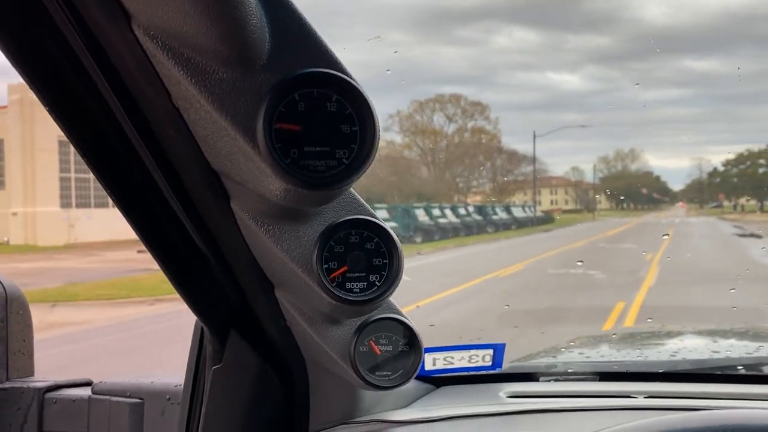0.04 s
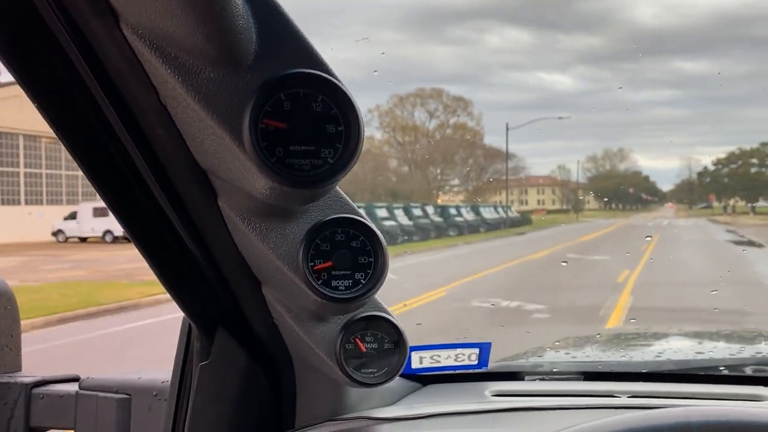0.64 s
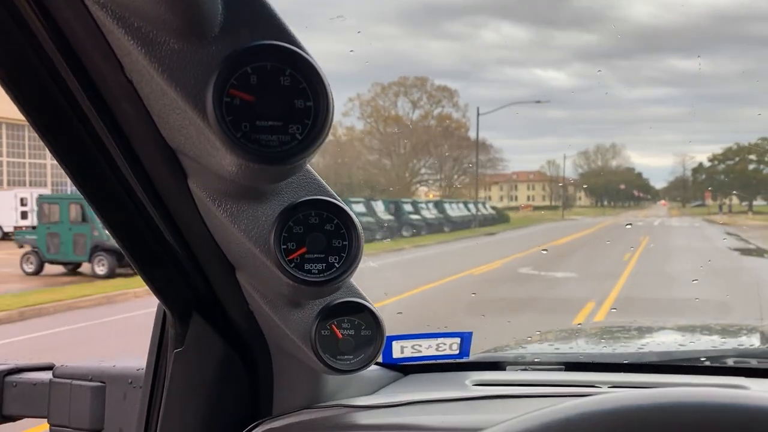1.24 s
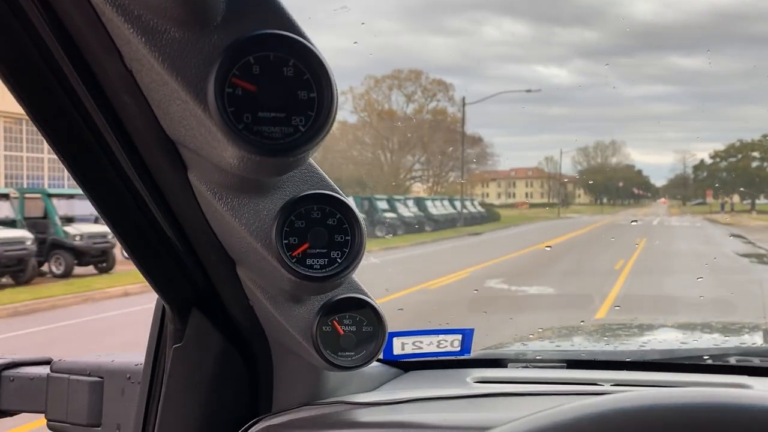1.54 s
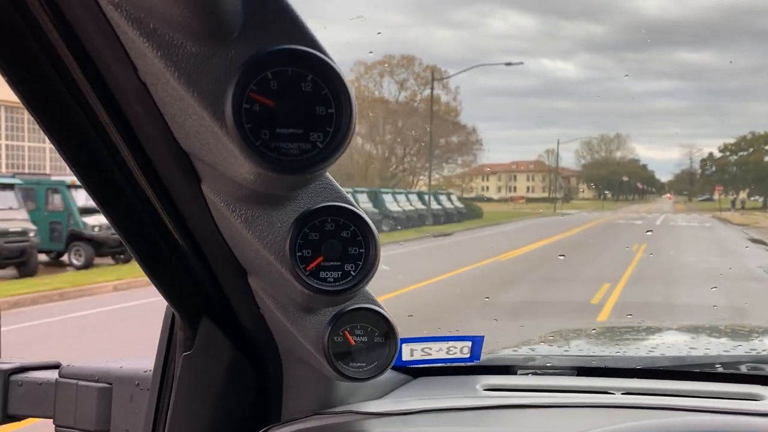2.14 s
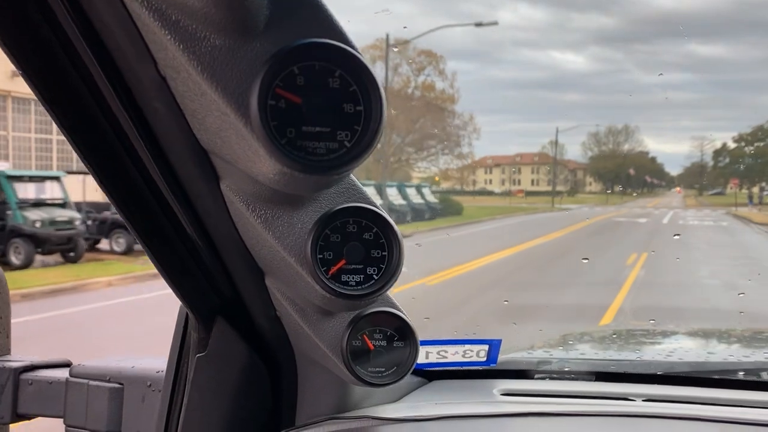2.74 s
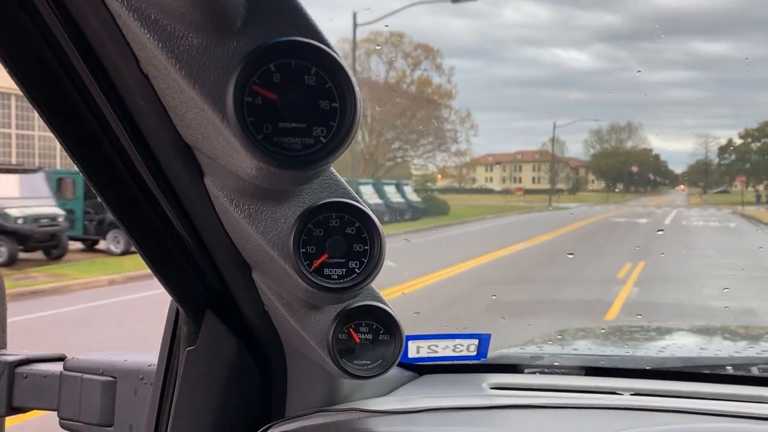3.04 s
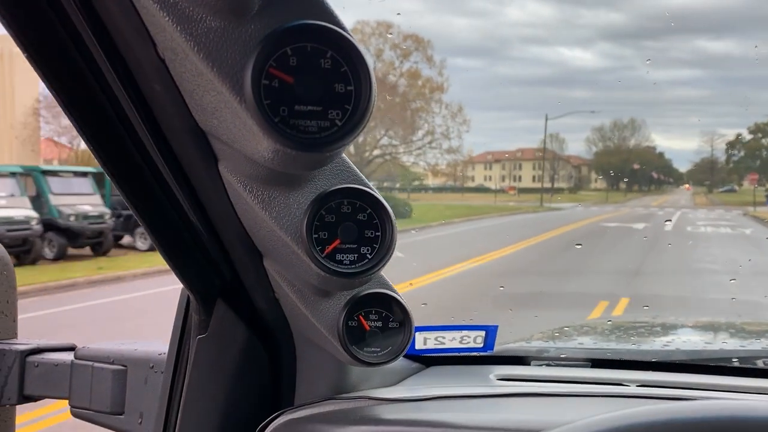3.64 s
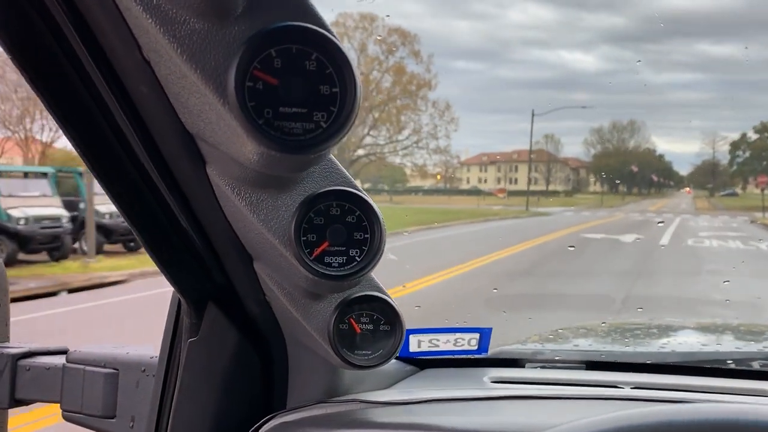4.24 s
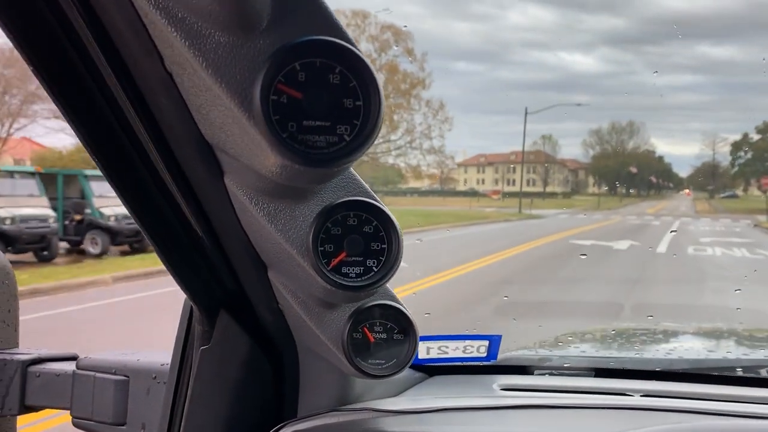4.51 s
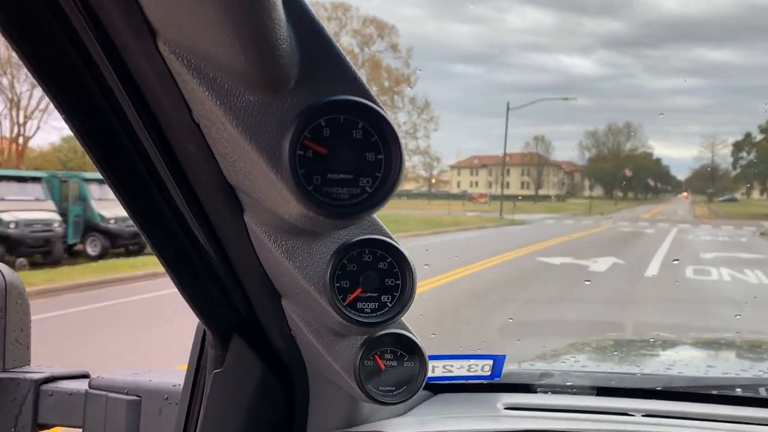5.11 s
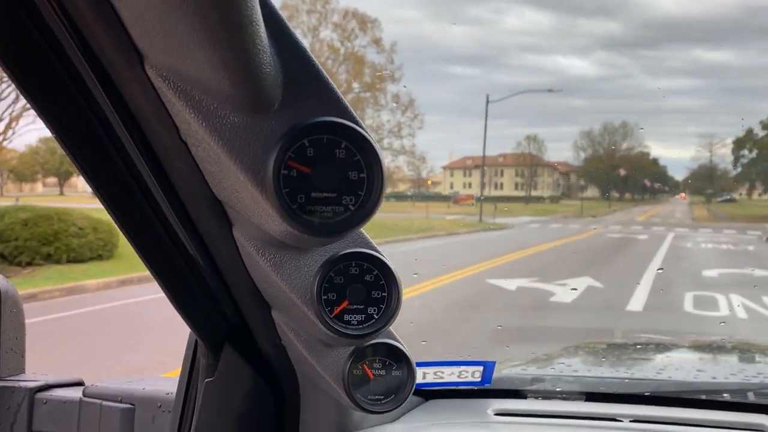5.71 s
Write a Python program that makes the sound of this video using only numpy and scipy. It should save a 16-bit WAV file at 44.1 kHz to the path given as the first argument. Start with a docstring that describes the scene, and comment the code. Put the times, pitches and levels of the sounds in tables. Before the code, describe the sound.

Heard from inside the cab of a moving pickup, a diesel engine pulls hard, droning and clattering while a high, hissy turbo whistle climbs. The throttle soon closes and the whistle winds down as the revs drop. What remains is a quieter cruise: a low, throbbing engine hum, tyres on asphalt, faint wind hiss and a few soft rattles of loose trim.

```python
"""A deep exhaust drone, hard clatter and a rising whistle fill the cab of a turbo-diesel V8 pickup.
Each firing of a cylinder pushes a pulse down the exhaust and knocks the engine block; the spinning
turbo makes the whistle. The driver lifts off the pedal, the drone fades and the whistle winds down.
The truck rolls on with a soft engine hum, throbbing knocks and pings, cab rumble, tyre noise
and a few rattles of loose trim."""
import sys
import numpy as np
from scipy import signal
from scipy.fft import rfft, irfft
from scipy.io import wavfile
from scipy.ndimage import uniform_filter1d

SR = 44100
rng = np.random.default_rng(int(sys.argv[2]) if len(sys.argv) > 2 else 0)


def output_pcm(signal):
    """Save a mono or channel-first signal as 16-bit PCM at the path in sys.argv[1].

    Samples are clipped to [-1, 1] before scaling.
    """
    pcm = np.clip(np.atleast_2d(signal).T, -1, 1) * 32767
    wavfile.write(sys.argv[1], SR, np.round(pcm).astype(np.int16))


N = 254456
T = np.arange(N) / SR
BIN_HZ = np.maximum(np.arange(N // 2 + 1) * SR / N, 1)
CYLINDERS = 8  # each fires once per engine cycle
LIFT_S, SHUT_S, CRUISE_S = 0.74, 1.535, 3.2  # the pedal starts to lift, is fully up; cruising begins

# Engine speed, as firings per second: time_s, firing_hz
ENGINE_SPEED = [(0, 132.2), (.15, 137.3), (.55, 147.7), (.75, 149.3), (.85, 143.7), (1.1, 122.5),
                (1.36, 106.3), (1.52, 106), (1.7, 119), (1.92, 114.5), (2.4, 102), (2.65, 95.5), (2.92, 92),
                (3.15, 84), (3.5, 79.5), (4.45, 80.6), (5.05, 88.2), (5.77, 88)]
# Turbo speed, as the pitch of its whistle: time_s, pitch_hz
TURBO_SPEED = [(0, 6750), (.25, 7550), (.56, 9900), (.68, 10150), (.8, 9800), (1.05, 8400), (1.18, 7850),
               (1.25, 7150), (1.36, 7000), (1.5, 6500), (1.72, 5540), (2, 5160), (2.47, 4580), (2.77, 4235),
               (3.15, 3730), (3.6, 3450)]
# How loud the tyres roar: time_s, level_db
TYRE_LEVEL = [(0, -43), (1.1, -36.5), (2.3, -34), (3.7, -36), (5.77, -43)]


def undb(db):
    """Turn decibels into a gain."""
    return 10 ** (np.asarray(db) / 20)


def unit(x):
    """Scale to an average (rms) level of 1."""
    return x / np.sqrt(np.mean(x ** 2))


def curves(table):
    """Join the rows of a time table with straight lines, one value per sample."""
    times, *columns = np.transpose(table)
    return np.squeeze([np.interp(T, times, column) for column in columns])


def response(points):
    """A gain for every frequency, from rows of pitch_hz, gain_db."""
    hz, db = np.transpose(points)
    return undb(np.interp(np.log(BIN_HZ), np.log(hz), db))


def resonances(modes, at=BIN_HZ):
    """Gain at the given frequencies, from peaks listed as pitch_hz, width_hz, gain_db."""
    return undb(sum(db / (1 + (2 * (at - hz) / width) ** 2) for hz, width, db in modes))


def colour(x, gain):
    """Filter a sound with one gain per frequency."""
    return irfft(rfft(x) * gain, N)


def wander(rate_hz):
    """A smooth random wobble of size 1, up to about the given rate."""
    return unit(colour(rng.standard_normal(N), np.exp(-np.minimum(BIN_HZ / rate_hz, 10) ** 2)))


def flutter(rate_hz):
    """A two-part wobble that shifts both the level and the phase of a tone."""
    return wander(rate_hz) + 1j * wander(rate_hz)


def swells(events, attack_s):
    """A level that rises and dies away for each row of peak_s, level_db, decay_s."""
    return sum(undb(db) * np.clip(1 + (T - s) / attack_s, 0, 1) * np.exp(-np.maximum(T - s, 0) / decay)
               for s, db, decay in events)


def steady(x, window_s=0.056):
    """Even out the chance swells of a noise."""
    power = uniform_filter1d(np.mean(x ** 2, axis=0), int(window_s * SR))
    return x * np.sqrt(power.mean() / power)


def place(x, pan_db):
    """Lean a sound to the left (positive) or right (negative)."""
    return x * undb(np.array([[pan_db], [-pan_db]]) / 2)


def cab(pair, gain):
    """Filter two signals into cab sound: bass alike in both ears, treble scattered by the glass."""
    # Strength of the side (what differs between the ears) against the mid: pitch_hz, gain_db
    ear_width = [(60, -14), (130, -11.5), (220, -10), (380, -2), (700, 0), (1290, -1), (2600, -4),
                 (4400, -3.5), (8000, 2), (15000, -1)]
    # How much louder the left ear is: pitch_hz, gain_db
    ear_lean = [(60, -5), (130, -2), (220, -2), (400, 0.5), (700, 2.5), (1290, 3), (2400, -0.5), (4400, -5),
                (8000, 0.5), (15000, 2.5)]
    # Part of the side that is the mid a quarter wave early (negative: late): pitch_hz, share
    ear_lead = [(150, 0.22), (430, 0.59), (690, 1), (1460, 0.92), (2000, 0.4), (2800, -0.77), (5300, -.6),
                (7000, .75), (11000, .3)]
    mid, scattered = colour(pair, gain)
    lead = np.clip(np.interp(BIN_HZ, *np.transpose(ear_lead)), -1, 1)
    width = response(ear_width)
    side = colour(mid, 1j * lead * width) + colour(scattered, np.sqrt(1 - lead ** 2) * width)
    lean = np.sqrt(response(ear_lean))
    return np.array([colour(mid + side, lean), colour(mid - side, 1 / lean)]) / np.std(mid)


def cab_noise(gain):
    """Filtered noise spread around the cab."""
    return cab(rng.standard_normal((2, N)), gain)


def throttle():
    """How far the pedal is down, from 1 to 0."""
    return np.clip((SHUT_S - T) / (SHUT_S - LIFT_S), 0, 1)


def firings(cycle, jitter_s):
    """The slightly uneven sample position of each firing, and a random number for its strength."""
    on_time = np.flatnonzero(np.diff(np.floor(cycle * CYLINDERS)))
    timing, strength = rng.standard_normal((len(on_time), 2)).T
    return np.clip(on_time + (jitter_s * SR * timing).astype(int), 0, N - 1), strength


def exhaust(cycle, shake_db=-2.0, roughness=0.071, softening=0.28):
    """The firing tone swells as the engine pulls; one weak cylinder adds an uneven beat, the lope."""
    # How loud the drone is: time_s, level_db
    drone_level = [(0, -11.5), (.45, -11), (.75, -9.5), (.97, -11), (1.22, -15.5), (1.36, -18), (1.47, -32)]
    # Tones of the lope against the firing tone: order (waves per engine cycle), gain_db
    lope_tones = [(3, -24), (5, -32.5), (6, -25.5), (7, -22), (9, -14.5), (10, -18), (11, -15.5), (12, -21),
                  (13, -40), (14, -25.5), (15, -27), (16, -39), (18, -38), (19, -27.5), (21, -30),
                  (23, -36), (24, -29.5), (28, -40)]
    # Pipe resonances that growl as a tone slides into them: pitch_hz, width_hz, gain_db
    pipe_modes = [(186.4, 13, 4), (242, 18, 6.5), (398, 22, 4.5), (451, 22, 10)]
    drone_db = curves(drone_level)
    firing = np.cos(2 * np.pi * CYLINDERS * cycle) * undb(shake_db * wander(25))
    cycle_hz = np.gradient(cycle) * SR
    lope = 0
    for order, db in lope_tones:
        # softer pulses lose their high tones first
        softer_db = softening * (drone_db - drone_db.max()) * max(order / CYLINDERS - 1.5, 0)
        size = undb(db + softer_db) * resonances(pipe_modes, order * cycle_hz)
        size *= 1 + roughness * wander(17)
        lope -= size * np.cos(2 * np.pi * order * cycle + np.pi / 4)
    return place(np.sqrt(2) * (firing + lope) * undb(drone_db), pan_db=0)


def combustion(pull_db=-26.5, coast_db=-47, cruise_db=-40.5):
    """Strength of the knocks: hard when pulling, weakest when coasting, firmer again when cruising."""
    light_db = np.interp(T, [SHUT_S, CRUISE_S], [coast_db, cruise_db])
    return np.hypot(undb(pull_db) * throttle() ** 0.81, undb(light_db))


def clatter(cycle, ring_s=0.017, scatter_db=2.13, gas_db=-3, gas_above_hz=900):
    """Each cylinder knocks the block along its own path and gas hisses; at low speed the knocks throb."""
    # Tone of the clatter: pitch_hz, gain_db
    clatter_colour = [(150, 5.5), (280, 8), (430, 1), (520, 2), (1400, -4), (2300, -7.5), (3150, -10.5),
                      (3500, -18), (4400, -21), (5200, -23), (7500, -20.5), (9000, -38.5), (10500, -31.5),
                      (14500, -46.5)]
    # Resonances of the engine block and the wall behind it: pitch_hz, width_hz, gain_db
    block_modes = [(440, 16, -1.5), (650, 14, 1), (910, 32, -8), (1000, 66, 5.5), (1180, 33, 1),
                   (1294, 43, 7.5), (1514, 29, 6.5), (1690, 32, 0.5), (2776, 47, 7), (3000, 54, 3.5),
                   (3205, 40, 3), (4310, 71, 8)]
    # How much every other knock stands out: firing_hz, depth (0 to 1)
    throb_depth = [(80, .24), (100, .11), (130, .02)]
    at, strength = firings(cycle, jitter_s=0.00006)
    size = undb(scatter_db * strength)
    fade = np.exp(-T[:SR // 10] / ring_s)
    knocks = 0
    for k in range(CYLINDERS):
        blows = np.zeros((1, N))
        blows[0, at[k::CYLINDERS]] = size[k::CYLINDERS]
        ring = fade * rng.standard_normal((2, len(fade)))
        knocks += signal.oaconvolve(blows, ring, axes=1)[:, :N]
    gas = colour(rng.standard_normal((2, N)), 1 / (1 + (gas_above_hz / BIN_HZ) ** 4))
    depth = np.interp(curves(ENGINE_SPEED), *np.transpose(throb_depth))
    throb = depth * np.cos(np.pi * CYLINDERS * cycle - np.pi / 4)
    lope = 0.02 * throttle() * np.cos(2 * np.pi * cycle)
    block = response(clatter_colour) * resonances(block_modes)
    return cab(unit(knocks) + undb(gas_db) * gas, block) * combustion() * (1 + throb + lope)


def turbo(gap_hz=165, clean_hz=3500, hissy_hz=6000, octave_db=-16.5, flicker_db=1):
    """The turbo's wheel whistles at two close pitches: hissy when fast, clearer as it slows."""
    # How loud the two whistles are: time_s, lower_db, upper_db
    whistle_levels = [(0, -45.5, -58), (.6, -45, -51), (1.1, -54, -52), (1.27, -56, -64), (1.49, -54, -65),
                      (1.64, -76, -73), (1.74, -60, -64), (1.848, -49.5, -55), (1.95, -55, -65),
                      (2.38, -68, -70), (2.48, -54, -62), (2.63, -57, -57), (2.71, -61, -66),
                      (2.771, -57, -66), (2.87, -54.5, -62), (3, -60, -64), (3.15, -58, -55),
                      (3.26, -64, -69), (3.6, -74, -78)]
    # Peaks and dips of the air duct that the whistles slide through: pitch_hz, width_hz, gain_db
    duct_modes = [(3780, 110, -2), (4236, 70, 9.5), (4680, 70, 6), (5365, 65, 6.5), (7430, 990, 5),
                  (8800, 1100, -7.5)]
    hz = curves(TURBO_SPEED)
    hiss_share = np.clip((hz - clean_hz) / (hissy_hz - clean_hz), 0, 1)
    wide_share = np.sqrt(throttle())
    whistle = 0
    for pitch, db in zip((hz, hz + gap_hz), curves(whistle_levels)):
        tone = np.exp(2j * np.pi * np.cumsum(pitch) / SR)
        # echoes in the cab make the tone flutter differently at each ear
        clear = 0.88 + 0.33 * np.array([flutter(65), flutter(65)])
        # the hiss is a wide band with the pedal down, a narrow one with it up
        wide = np.array([flutter(800), flutter(800)])
        narrow = np.array([flutter(110), flutter(110)])
        hiss = np.sqrt(wide_share) * wide + np.sqrt(1 - wide_share) * narrow
        blend = np.sqrt(2 * (1 - hiss_share)) * clear + np.sqrt(hiss_share) * hiss
        octave = tone ** 2 * narrow * np.sqrt(1 - hiss_share) * undb(octave_db)
        whistle += np.real(tone * blend * resonances(duct_modes, pitch) + octave) * undb(db)
    return place(whistle * undb(flicker_db * wander(20)), pan_db=-3)


def intake(full_db=-46, flicker_db=1.5):
    """Air rushes through the turbo while it spins fast and the pedal is down."""
    # Tone of the rushing air: pitch_hz, gain_db
    rush_colour = [(4000, -24), (7000, -7), (8300, 10.5), (9100, -32), (9900, 7.5), (11500, 0.5),
                   (14000, 0), (15400, -13)]
    hz = curves(TURBO_SPEED)
    flow = (hz / hz.max()) ** 2.7 * throttle() ** 5
    return cab_noise(response(rush_colour)) * flow * undb(full_db + flicker_db * wander(11))


def rumble(road_db=-23.5, shake_db=-20.5, shake_at_hz=117.4, shake_db_per_hz=-0.2825):
    """The road shakes the cab; so does the pulling engine, less as it speeds up."""
    # Tone of the rumble: pitch_hz, gain_db
    rumble_colour = [(15, -42), (25, -20), (40, -3), (57, 0), (85, -1), (110, -1.5), (135, -1.5),
                     (190, 0.5), (215, -2.5), (270, -13), (330, -21), (420, -20.5), (520, -26.5),
                     (900, -62), (3000, -92)]
    tyre_db = curves(TYRE_LEVEL)
    road = undb(road_db + 0.3 * (tyre_db - tyre_db.max()))  # partly follows the tyres' swell
    shake = undb(shake_db + shake_db_per_hz * (curves(ENGINE_SPEED) - shake_at_hz)) * throttle() ** 0.27
    return steady(cab_noise(response(rumble_colour))) * np.hypot(road, shake)


def boom(base_db=-33.5):
    """The air in the cab booms at its lowest resonance, swelling now and then."""
    # Tone of the boom: pitch_hz, gain_db
    boom_colour = [(40, -27), (50, -1.5), (57, 3.5), (62, -14), (72, -28)]
    # Swells of the low cab boom: peak_s, level_db, decay_s
    boom_swells = [(.72, -32, .2), (1.92, -30, 0.3), (4.3, -18, 0.079), (5.51, -25, .12)]
    top_hz = boom_colour[-1][0]
    level = np.hypot(swells(boom_swells, attack_s=0.044), undb(base_db))
    return cab_noise(response(boom_colour) * (BIN_HZ < top_hz)) * level


def tyres(patchy_db=0.9):
    """The tread roars on the asphalt and slaps over seams in the road."""
    # Tone of the roar: pitch_hz, gain_db
    tyre_colour = [(250, -4.5), (400, -1), (520, -6.5), (680, 2), (860, -3), (1050, -6), (1250, -11),
                   (1700, -18.5), (2400, -25), (5000, -51.5), (10000, -70)]
    # Resonances of the tread: pitch_hz, width_hz, gain_db
    tread_modes = [(642, 8.6, 5.5), (854, 51, 5.5)]
    # Slaps over seams: peak_s, level_db, decay_s
    slaps = [(1.575, -29, 0.013), (1.76, -31, 0.012), (2.982, -32, 0.0059)]
    roar = undb(curves(TYRE_LEVEL) + patchy_db * wander(23))
    contact = np.hypot(roar, swells(slaps, attack_s=0.003))
    return cab_noise(response(tyre_colour) * resonances(tread_modes)) * contact


def wind(level_db=-50, gust_db=1):
    """Air hisses along the doors."""
    # Tone of the hiss: pitch_hz, gain_db
    air_colour = [(900, -37), (1700, 5), (2800, 5.5), (3500, -4), (4500, 1), (5200, -4), (6300, -2.5),
                  (7700, -10), (9000, -20), (11000, -17.5), (14500, -30)]
    return cab_noise(response(air_colour)) * undb(level_db + gust_db * wander(25))


def hum(cycle):
    """As the pedal lifts, the engine's low tones beat together, each swelling at a cab resonance."""
    # Tones of the hum: order (waves per engine cycle), gain_db
    hum_tones = [(4, -7.5), (7, 1), (8, -3.5), (11, -9), (12, -0.5), (13, -4.5), (14, -6), (15, -2.5),
                 (16, -3), (18, -11.5), (20, -14), (22, -19)]
    # Resonances of the air in the cab: pitch_hz, width_hz, gain_db
    cab_modes = [(55, 8, 11), (179, 20, 13)]
    # How loud the hum is: time_s, level_db
    hum_level = [(1.5, -44), (1.62, -33), (1.85, -26.5), (2.2, -30), (2.7, -30), (3.1, -38), (3.35, -31),
                 (4.2, -31), (4.65, -29), (5.77, -33.5)]
    cycle_hz = curves(ENGINE_SPEED) / CYLINDERS
    tones = 0
    for order, db in hum_tones:
        waver = 1 + 0.12 * flutter(5)
        size = undb(db) * resonances(cab_modes, order * cycle_hz)
        tones += size * np.real(waver * np.exp(2j * np.pi * (order * cycle + rng.random())))
    return place(tones * undb(curves(hum_level)) * (1 - throttle()), pan_db=-2.5)


def ping(cycle, level_db=-41.5, scatter_db=3, softer_db_per_s=2.7):
    """As the pedal lifts, uneven firings make the block ping; it softens as the engine settles."""
    # Ringing notes of the block: pitch_hz, gain_db, decay_s
    ping_modes = [(657, -8, 0.0041), (766, -2.5, 0.0026), (853, 2.5, 0.0077), (985, -7, 0.0051)]
    at, strength = firings(cycle, jitter_s=0.0004)
    blows = np.bincount(at, undb(scatter_db * np.minimum(strength, 2)), N)
    blows -= blows.mean()
    t = T[:SR // 10]
    ring = sum(undb(db) * np.exp(-t / decay) * np.sin(2 * np.pi * hz * t) for hz, db, decay in ping_modes)
    delayed = np.roll(blows, SR // 500)  # 2 ms later
    pings = cab(np.array([blows, delayed]), rfft(ring, N))
    return pings * (1 - throttle()) * undb(level_db - softer_db_per_s * np.maximum(T - CRUISE_S, 0))


def trim():
    """Loose trim in the cab gives a few short, soft rattles."""
    # Tone of the trim: pitch_hz, gain_db
    trim_colour = [(1500, -30), (3700, -25), (4350, 0), (4700, 2), (5300, -18), (6400, -6), (8500, -20),
                   (14000, -34)]
    # Rattles: peak_s, level_db, decay_s
    rattles = [(2.992, -52, .018), (3.39, -50, .022), (3.59, -54, .03), (4.32, -53.5, .02), (5.7, -52, .02)]
    return cab_noise(response(trim_colour)) * swells(rattles, attack_s=0.013)


def scene():
    """One turning engine drives four sounds; turbo, road, wind and trim sound beside them."""
    cycle = np.cumsum(curves(ENGINE_SPEED)) / SR / CYLINDERS  # engine cycles so far
    engine = exhaust(cycle) + hum(cycle) + clatter(cycle) + ping(cycle)
    return engine + turbo() + intake() + rumble() + boom() + tyres() + wind() + trim()


def record(dry, fade_s=0.004, ceiling=0.97, top_hz=15000):
    """Fade both ends, round off the highest peaks and cut the very top of the treble."""
    fades = np.clip(np.minimum(T, T[::-1]) / fade_s, 0, 1)
    rounded = dry / (1 + (dry / ceiling) ** 8) ** (1 / 8)
    return signal.sosfilt(signal.ellip(8, 0.2, 70, top_hz, fs=SR, output="sos"), fades * rounded)


dry = scene()
out = record(dry)
output_pcm(out)
```